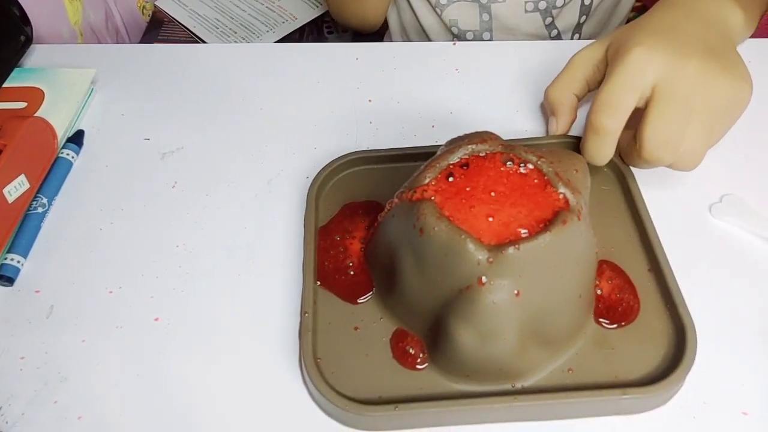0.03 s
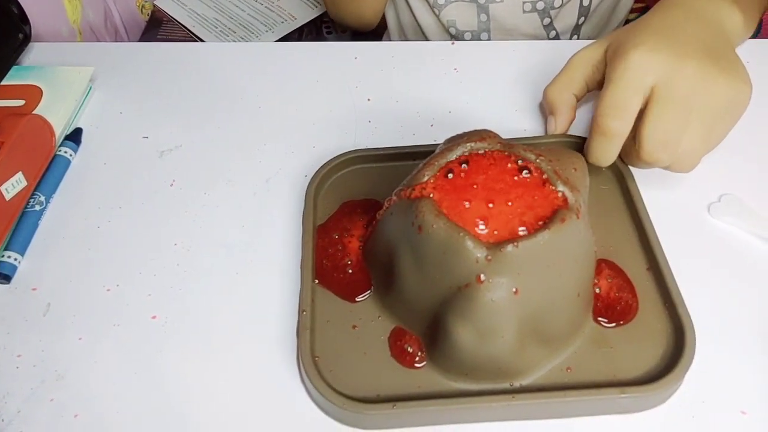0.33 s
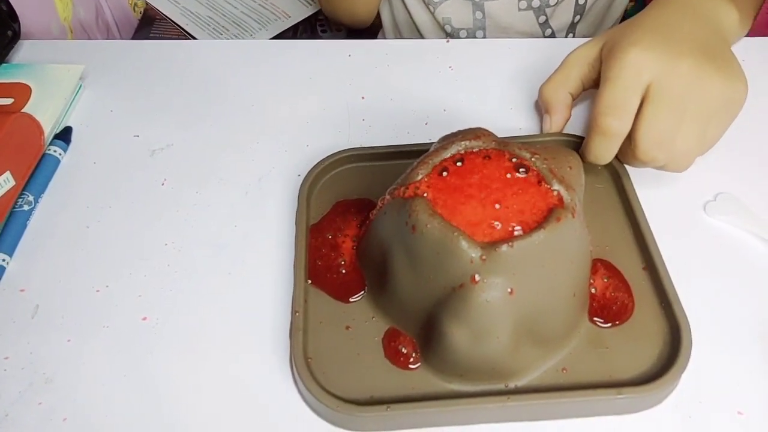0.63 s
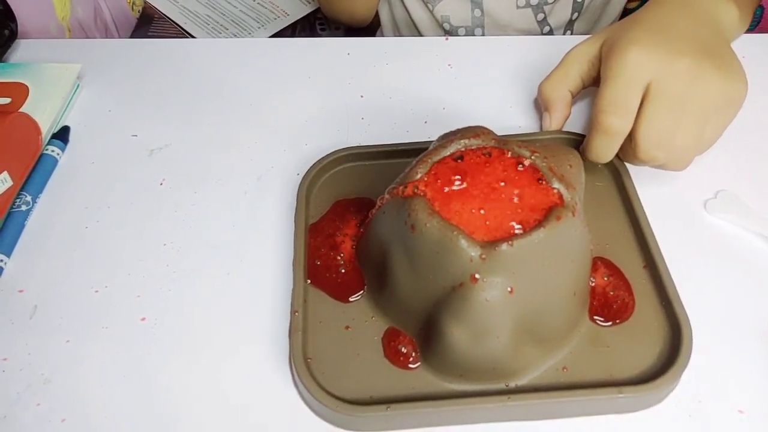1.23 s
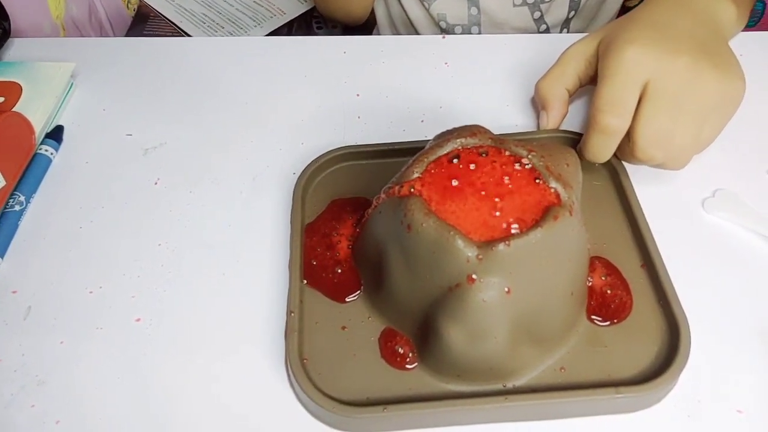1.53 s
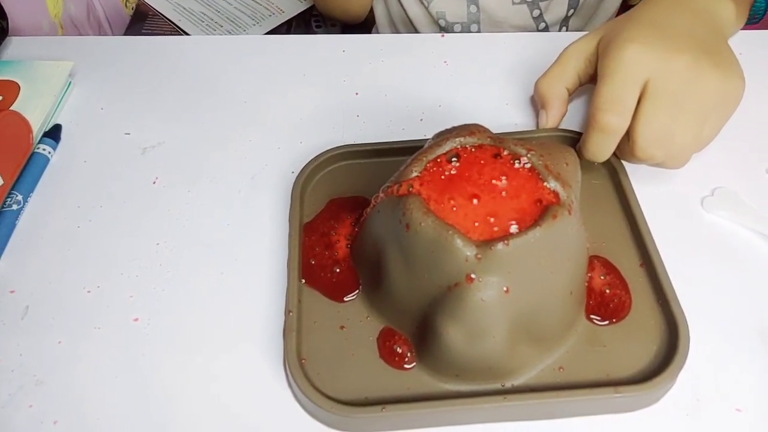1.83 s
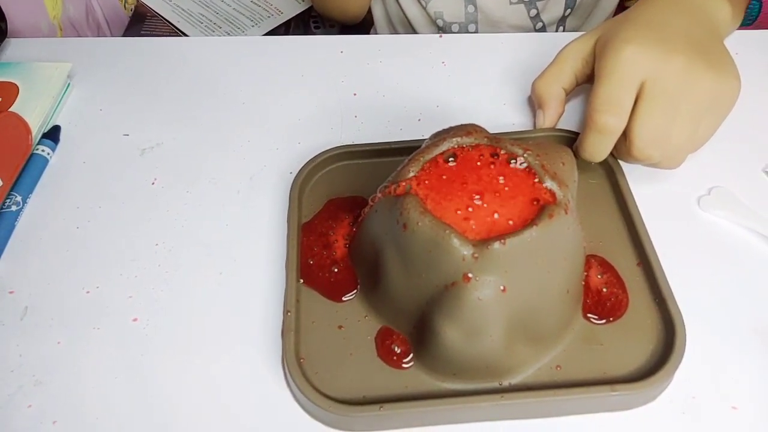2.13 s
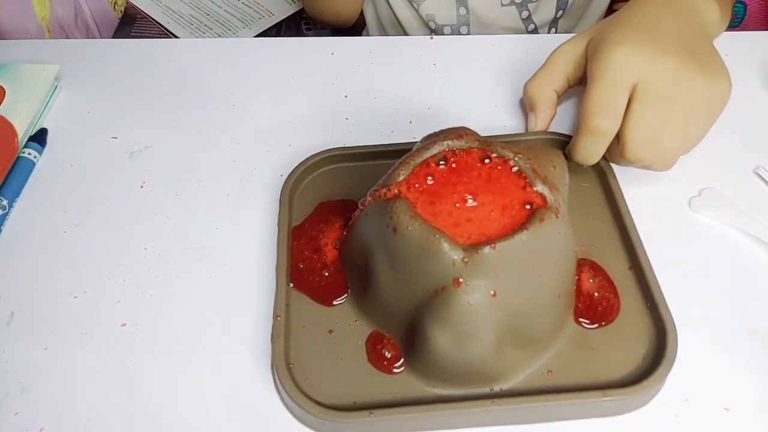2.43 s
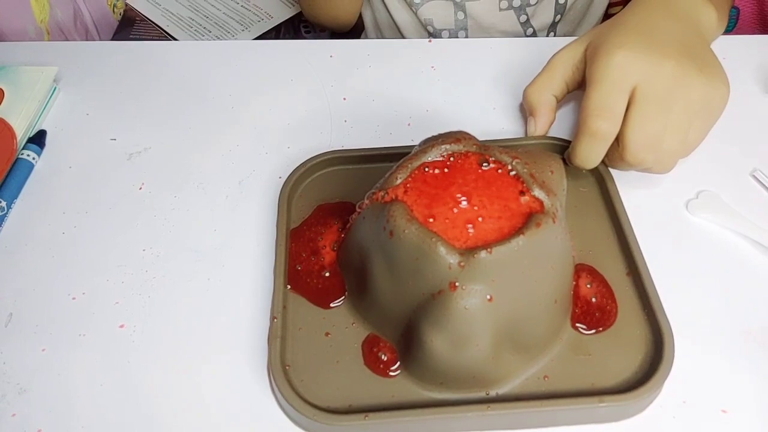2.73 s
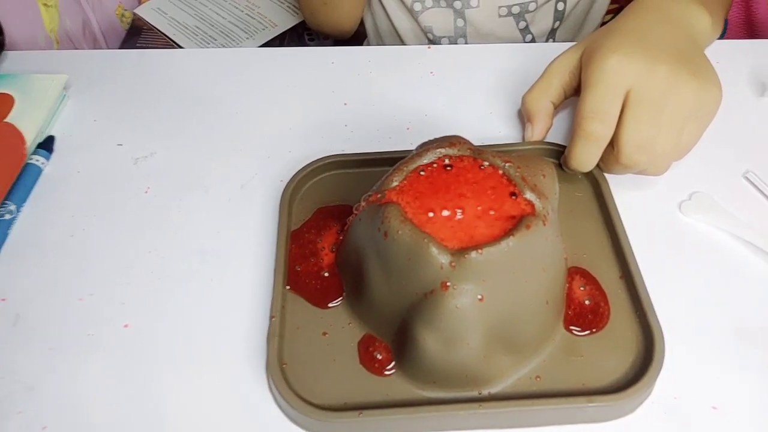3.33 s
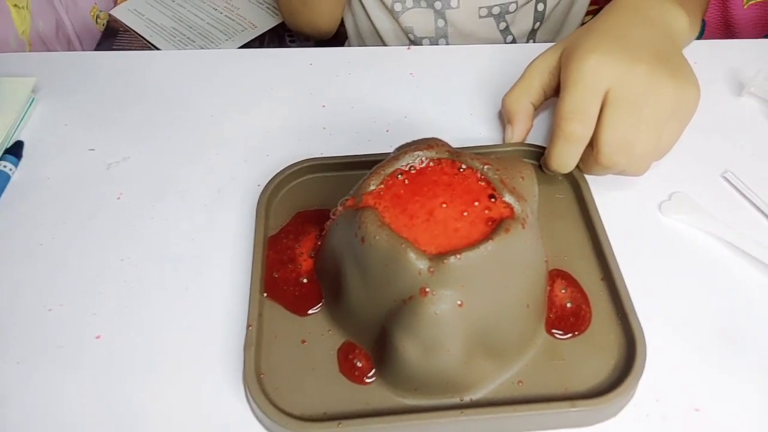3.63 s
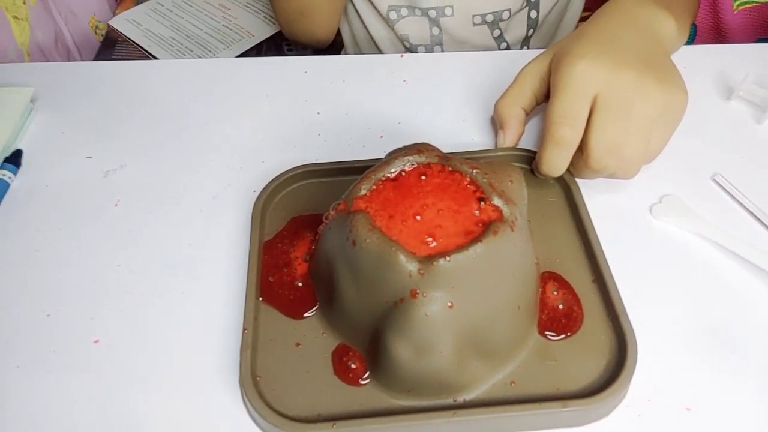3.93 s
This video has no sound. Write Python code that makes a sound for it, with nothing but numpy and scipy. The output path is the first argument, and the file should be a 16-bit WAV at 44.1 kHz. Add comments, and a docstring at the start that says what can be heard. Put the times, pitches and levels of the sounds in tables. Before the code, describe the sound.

A faint fizz of tiny bubbles from a toy volcano, with a low room hum.

```python
"""A faint fizz over a low hum: a model volcano foams on a table in a quiet room.
Tiny bubbles burst in the foam, each a brief damped oscillation; their sizzle climbs in pitch and
swells once into a crackle. A hand makes a few faint clicks and rubs. Behind them a motor, probably
a fridge or air conditioner, drones with mains hum and a thin whine over moving air."""
import sys
import numpy as np
from scipy import signal
from scipy.fft import rfft, irfft
from scipy.io import wavfile
from scipy.ndimage import uniform_filter1d

SR = 44100
rng = np.random.default_rng(int(sys.argv[2]) if len(sys.argv) > 2 else 0)


def put_to_file(sound):
    """Save the sound as 16-bit audio at rate SR, in the file named by the first command-line argument."""
    columns = np.atleast_2d(sound).T  # one column per channel
    safe = np.clip(columns, -1, 1)
    whole_steps = np.round(safe * 32767)
    wavfile.write(sys.argv[1], SR, whole_steps.astype(np.int16))


N = 176400
TIME = np.arange(N) / SR

# The climbing sizzle. Each row: time in seconds, centre in Hz, right level in dB.
SIZZLE = [(0, 7700, -74), (.45, 7750, -68), (.56, 7780, -61), (.86, 7880, -63), (1, 8430, -60.5),
          (1.5, 8560, -61), (1.95, 8880, -57.2), (2.25, 8980, -58), (2.55, 9080, -57.8), (2.82, 9200, -57),
          (3.2, 9280, -59), (3.5, 9200, -63), (3.7, 9100, -74), (4, 9000, -74)]
# The crackle of larger bubbles. Each row: time in seconds, right level in dB.
CRACKLE = [(0, -80), (1.6, -72), (2.1, -63), (2.6, -63), (2.68, -56), (2.9, -55.5), (3.05, -62), (3.5, -66),
           (4, -80)]
# The bright hiss. Each row: time in seconds, left level in dB, right level in dB.
BRIGHT_HISS = [(0, -56, -57.5), (1.4, -56.5, -57), (2.55, -55.5, -58), (2.75, -55.5, -56.5),
               (3.1, -58, -58), (3.45, -56.5, -55), (3.72, -58, -58), (4, -57, -55)]
# Ticks of hand and bubbles. Each row: start in seconds, right gain in dB, ring in Hz,
# left minus right in dB.
CLICKS = [(.205, -44, 1300, -6), (1.514, -42, 14500, -2), (2.168, -41, 2100, -10),
          (2.6474, -29.3, 2600, -14), (3.442, -42, 2300, -10), (3.835, -40.5, 1050, 0)]
# Rubs and spurts of foam. Each row: start in seconds, length in seconds, right level in dB,
# centre in Hz, width in Hz, left minus right in dB.
RUSTLES = [(.42, .3, -61, 3400, 550, -4), (.535, .06, -68.5, 950, 110, 11), (1.2, .28, -61.5, 3000, 300, 0),
           (1.495, .05, -60, 14800, 900, -2), (2.52, .04, -55, 2300, 550, -6),
           (2.685, .06, -55.5, 2300, 550, -5), (2.76, .045, -60, 2100, 450, -5),
           (3.81, .045, -54.5, 950, 450, -1)]
# Drone and whine. Each row: multiple of the shaft speed, left level in dB, right level in dB.
SHAFT_ORDERS = [(1, -47.3, -47.2), (2, -72, -73), (3, -77, -76), (5, -72, -75), (6, -65.5, -72.5),
                (35, -89, -89), (46, -94, -83), (47, -92, -83), (48, -85, -84), (49, -85, -80),
                (50, -85, -82), (52, -97, -82), (53, -85, -79), (54, -86, -85), (55, -85, -85),
                (62, -87, -82), (69, -84, -96), (70, -89, -82), (71, -84, -82), (72, -84, -83),
                (74, -88, -85), (78, -88, -86), (79, -89, -84), (82, -97, -85), (87, -90, -85),
                (97, -90, -88)]
# Magnetic hum. Each row: multiple of the mains frequency, left level in dB, right level in dB.
MAINS_HARMONICS = [(2, -46.5, -46.7), (4, -60.7, -62.5), (6, -77, -78), (10, -72.5, -71.5), (12, -82, -84),
                   (14, -74, -77), (16, -81, -82), (18, -80, -87), (22, -74, -73), (30, -88, -85),
                   (40, -98, -84), (42, -96, -77)]
# The swell of the fourth mains harmonic. Each row: time in seconds, gain in dB.
HUM_SWELL = [(0, -0.5), (1.2, -1.5), (1.7, 3.5), (2.5, 1.5), (3.2, 0), (4, -2.5)]
# Base spectrum of the moving air. Each row: frequency in Hz, left and right density in dB per Hz.
AIR_SPECTRUM = [(15, -84, -85), (34.6, -86, -86), (55, -78, -72), (85.5, -81, -84), (114, -79, -80),
                (183, -83, -87), (243, -81.5, -78), (298, -80.5, -87), (407, -87.5, -84), (557, -94, -90.5),
                (562, -87, -83.5), (690, -87.5, -90.5), (756, -91.5, -92), (1160, -89, -90.5),
                (1240, -93, -91), (1520, -93.5, -93), (2360, -97.5, -94), (2680, -93, -90.5),
                (3230, -94.5, -93), (3760, -93, -93), (4800, -94.5, -95), (5560, -94.5, -94),
                (7600, -93, -97), (11200, -95, -95.5), (11800, -93.5, -95), (12600, -95.5, -98.5),
                (15100, -98.5, -96), (15900, -95, -95)]
# Resonances stirred by the air. Each row: centre in Hz, width in Hz, left and right level in dB.
AIR_RESONANCES = [(246.7, 7.7, -60.5, -64), (920.6, 14.4, -63.5, -101)]
# Likeness of the air at the two ears. Each row: frequency in Hz, coherence, right lead in radians.
AIR_COHERENCE = [(50, .99, -0.5), (192, 1, 0), (397, 0.49, 1.0), (597, 0.76, -0.03), (860, 0.36, 1.2),
                 (1230, 0.34, 2.7), (1710, 0.14, 4), (3280, 0.18, 3.5), (4830, 0.23, 3), (7800, 0.045, 1),
                 (13000, 0.12, 4), (16000, 0.33, 6)]
# Slow shading of the treble. Each row: time in seconds, left gain in dB, right gain in dB.
TREBLE_GAIN = [(0, -0.5, 1.5), (1.3, 0.1, 0.8), (1.8, -0.5, 0), (2.8, 0, 1), (3.3, 0, -0.2),
               (3.7, -0.7, -0.5), (4, 0, -0.5)]
# A band on the right, thinned until near the end. Each row: time in seconds, centre in Hz, gain in dB.
GLIDING_BAND = [(0, 14000, -4), (1.4, 13700, -2.5), (1.9, 12900, -4), (2.9, 12400, -5.5), (3.4, 12200, -3),
                (4, 11600, 2)]


def bubble_pops(pops_per_s=400, spread_db=2.7, decay_cycles=5.7):
    """Bubbles burst as a Poisson process, each a damped oscillation of a few cycles."""
    t, out = np.arange(256) / SR, np.zeros((2, N))
    pitches_hz = np.geomspace(7520, 13700, 16)
    for hz in pitches_hz:
        strength = amp(spread_db * np.minimum(rng.exponential(1, N), 4.5))
        impulses = strength * (rng.random(N) < pops_per_s / len(pitches_hz) / SR)
        ping = np.exp(-t * hz / decay_cycles) * np.sin(2 * np.pi * (hz * t + rng.random((2, 1))))
        out += signal.oaconvolve(impulses[None], ping, axes=1)[:, :N]
    return amp([[-64], [-61]]) * unit_rms(out)


def foam_sizzle():
    """Shot noise on the right: dense bursts ring a narrow, rising band and sparse ones a wider band."""
    centre_hz, db = curves(SIZZLE, TIME)
    sizzle = amp(db) * bursts(per_s=2500, hz=centre_hz, width_hz=540)
    crackle = amp(curves(CRACKLE, TIME)[0]) * bursts(per_s=260, hz=np.full(N, 8550), width_hz=1300)
    return (sizzle + crackle) * amp([[-12], [0]])


def bursts(per_s, hz, width_hz, spread_db=3):
    """Impulse excitation: random bursts, a few of them large, drive two like resonators in series."""
    strength = amp(spread_db * np.minimum(rng.exponential(1, N), 3.5))
    impulses = strength * (rng.random(N) < per_s / SR)
    return unit_rms(resonate(resonate(impulses, hz, width_hz), hz, width_hz))


def bright_hiss(flicker_db=1.0, waver_db=.25):
    """Band-limited noise, pitched differently in each ear, flickers by random amplitude modulation."""
    hz, t, noise = signal.stft(rng.standard_normal((2, N)), SR, nperseg=512)
    bands = np.array([bell(hz, centre=9650, width=640), bell(hz, centre=8170, width=620)])
    power = amp(curves(BRIGHT_HISS, t))[:, None] ** 2 * bands[:, :, None]
    flicker = amp(flicker_db * patches(noise.shape, size=7))
    hiss = signal.istft(noise * np.sqrt(power * SR / 2) * flicker, SR, nperseg=512)[1][:, :N]
    return hiss * amp(waver_db * drift(rate_hz=26))


def clicks(snap_hz=8000, snap_s=.00009, ring_s=.0004):
    """Heavily damped transients: the hand and larger bubbles give a snap and a very short ring."""
    out, t = np.zeros((2, N)), np.arange(512) / SR
    snap = 1.1 * np.exp(-t / snap_s) * np.sin(2 * np.pi * snap_hz * t)
    for start, db, hz, pan_db in CLICKS:
        ring = np.exp(-t / ring_s) * np.sin(2 * np.pi * hz * t)
        add(out, start, amp([[db + pan_db], [db]]) * (ring - snap))
    return out


def rustles():
    """Soft rubs and spurts of foam are bands of noise under half-sine envelopes."""
    out, hz = np.zeros((2, N)), np.fft.rfftfreq(N, 1 / SR)
    for start, length, db, centre, width, pan_db in RUSTLES:
        noise = rfft(rng.standard_normal((2, N)))
        grit = unit_rms(irfft(noise * np.sqrt(bell(hz, centre, width)), N))
        stroke = np.sin(np.pi * np.clip((TIME - start) / length, 0, 1))
        out += amp([[db + pan_db], [db]]) * stroke * grit
    return out


def motor(mains_hz=60.04, shaft_hz=56.0, fan_hz=22.4, speed_jitter=.0004):
    """Two harmonic series and a slow fan; the hum beats as the rotor slips behind the mains."""
    shaft_turns = shaft_hz * np.cumsum(1 + speed_jitter * drift(rate_hz=3)) / SR
    mains_cycles = mains_hz * TIME
    beat = np.sin(2 * np.pi * (mains_cycles - shaft_turns + rng.random()))
    out = sum(partial(k * shaft_turns, k * shaft_hz, *db) for k, *db in SHAFT_ORDERS)
    for k, *db in MAINS_HARMONICS:
        throb = (1 + .44 * beat) * amp(curves(HUM_SWELL, TIME)) if k == 4 else 1 + .14 * beat
        out += throb * partial(k * mains_cycles, k * mains_hz, *db)
    return out + partial(fan_hz * TIME, fan_hz, left_db=-61, right_db=-61)


def partial(cycles, hz, left_db, right_db, bass_hz=180, diffuse_hz=920):
    """Interaural differences: a motor tone above the bass lags on the left; high ones waver apart."""
    lag_s = .00045 / (1 + (bass_hz / hz) ** 2) ** 2
    phase = 2 * np.pi * (rng.random() - np.array([[hz * lag_s], [0]]))
    each_ear_db = 1.4 * min(hz / diffuse_hz, 1) ** 2 * np.array([drift(rate_hz=3), drift(rate_hz=3)])
    shared_db = (.12 + 2.2 * (bass_hz < hz < diffuse_hz)) * drift(rate_hz=3)
    level_db = np.array([[left_db], [right_db]]) + shared_db + each_ear_db
    return np.sqrt(2) * amp(level_db) * np.sin(2 * np.pi * cycles + phase)


def moving_air():
    """Steady broadband noise, coherent between the ears in the bass, excites two hollow resonances."""
    hz = np.fft.rfftfreq(N, 1 / SR)
    left, independent = rfft(rng.standard_normal((2, N)))
    coherence, lead = curves(AIR_COHERENCE, hz, np.log1p)
    coherence = np.clip(coherence, -1, 1)
    right = coherence * np.exp(1j * lead) * left + np.sqrt(1 - coherence ** 2) * independent
    power = amp(curves(AIR_SPECTRUM, hz, np.log1p)) ** 2
    for centre, width, *db in AIR_RESONANCES:
        lorentzian = 2 / (np.pi * width) / (1 + (2 * (hz - centre) / width) ** 2)
        power += amp(db)[:, None] ** 2 * lorentzian
    return irfft(np.array([left, right]) * np.sqrt(power * SR / 2), N)


def treble_flicker(x, corner_hz=2200, flicker_db=1.55, band_width_hz=610):
    """Time-varying filtering: the treble flickers, and a dip glides down on the right, then fills."""
    hz, t, spectrum = signal.stft(x, SR, nperseg=512)
    treble = (hz ** 2 / (hz ** 2 + corner_hz ** 2))[:, None]
    db = treble * curves(TREBLE_GAIN, t)[:, None]
    db += np.sqrt(treble) * flicker_db * patches(spectrum.shape, size=12)
    centre, band_db = curves(GLIDING_BAND, t)
    db[1] += band_db * np.exp(-.5 * ((hz[:, None] - centre) / band_width_hz) ** 2)
    return signal.istft(spectrum * amp(db), SR, nperseg=512)[1][:, :N]


def resonate(x, hz, width_hz):
    """A resonator of unit gain whose natural frequency follows the curve hz."""
    carrier = np.exp(2j * np.pi * np.cumsum(hz) / SR)
    pole = np.exp(-np.pi * width_hz / SR)
    return 2 * (carrier * signal.lfilter([1 - pole], [1, -pole], x / carrier + 1e-18)).real


def drift(rate_hz):
    """Low-pass filtered noise gives slow random motion of rms 1."""
    step = 256
    count = N // step + 2
    hz = np.fft.rfftfreq(count, step / SR)
    slow = irfft(rfft(rng.standard_normal(count)) * (hz > 0) / (1 + (hz / rate_hz) ** 2) ** 2, count)
    return np.interp(np.arange(N) / step, np.arange(count), unit_rms(slow))


def patches(shape, size):
    """Moving averages over frequency and time turn noise into blotches of rms 1."""
    across_frequency = uniform_filter1d(rng.standard_normal(shape), size=size, axis=1)
    return unit_rms(uniform_filter1d(across_frequency, size=size, axis=2))


def bell(hz, centre, width):
    """A Gaussian power spectrum of unit area."""
    return np.exp(-.5 * ((hz - centre) / width) ** 2) / (width * np.sqrt(2 * np.pi))


def curves(table, at, warp=np.asarray):
    """Linear interpolation along the first column gives a curve for each of the others."""
    x, *values = np.transpose(table)
    return np.array([np.interp(warp(at), warp(x), v) for v in values])


def add(mix, start_s, sound):
    """Superposes a stereo sound on the mix."""
    part = mix[:, round(start_s * SR):][:, :sound.shape[1]]
    part += sound[:, :part.shape[1]]


def amp(db):
    """Decibels to amplitude ratio."""
    return 10 ** (np.asarray(db) / 20)


def unit_rms(x):
    """Normalises to rms 1."""
    return x / np.sqrt(np.mean(x ** 2) + 1e-20)


def scene():
    """Superposition: the pressures from room, foam and hand add."""
    return (motor() + treble_flicker(moving_air() + bubble_pops())
            + bright_hiss() + foam_sizzle() + clicks() + rustles())


def record(dry, cutoff_hz=15800):
    """A steep low-pass filter limits the bandwidth."""
    lowpass = signal.firwin(1023, cutoff_hz, window=("kaiser", 9), fs=SR)
    return signal.oaconvolve(dry, lowpass[None], "same")


dry = scene()
out = record(dry)
put_to_file(out)
```